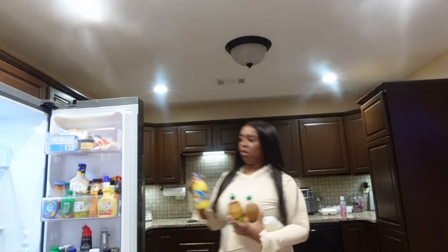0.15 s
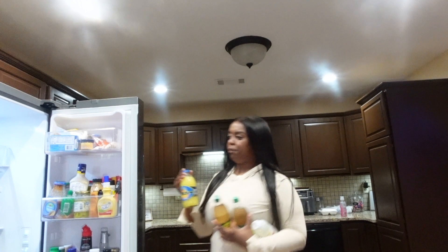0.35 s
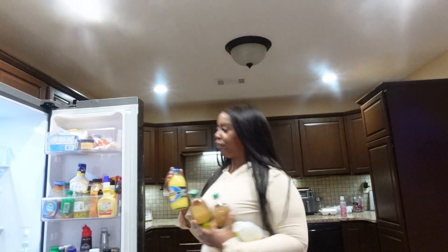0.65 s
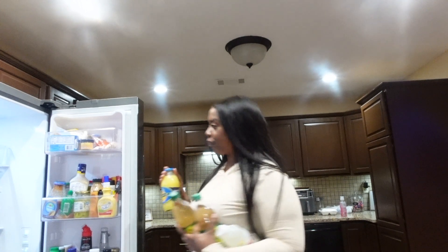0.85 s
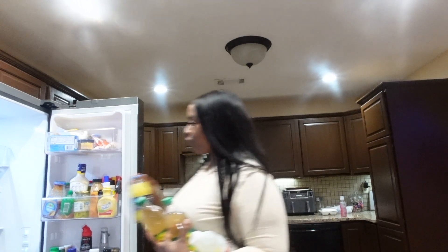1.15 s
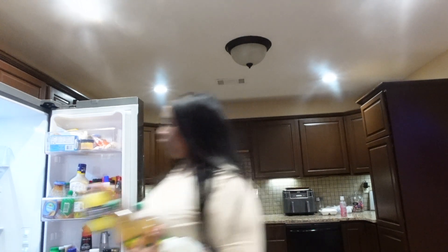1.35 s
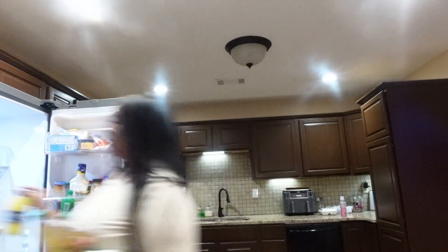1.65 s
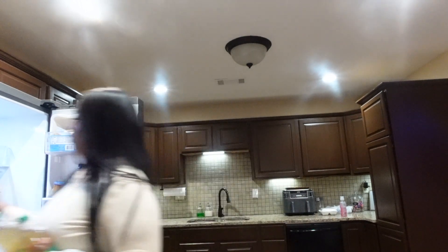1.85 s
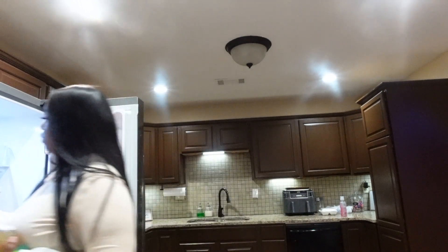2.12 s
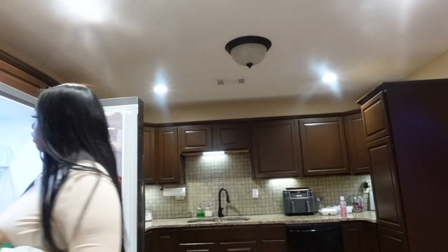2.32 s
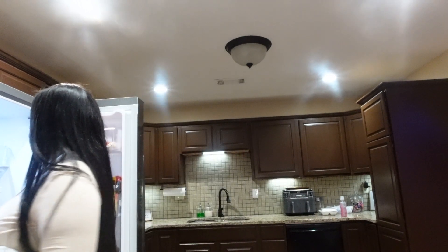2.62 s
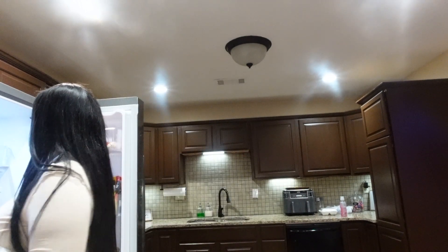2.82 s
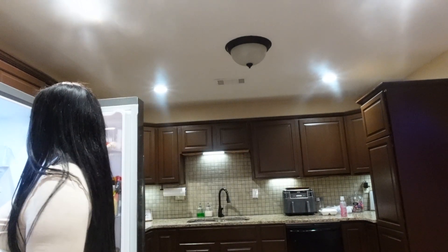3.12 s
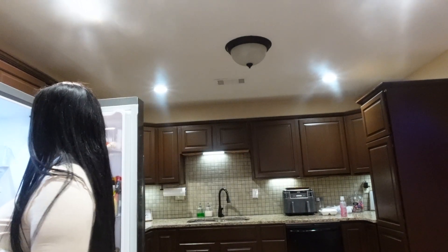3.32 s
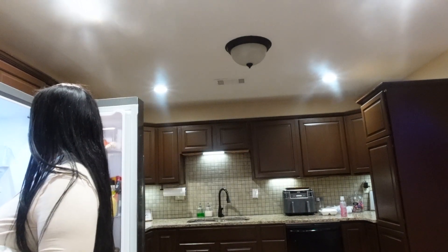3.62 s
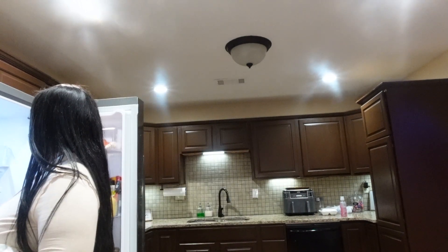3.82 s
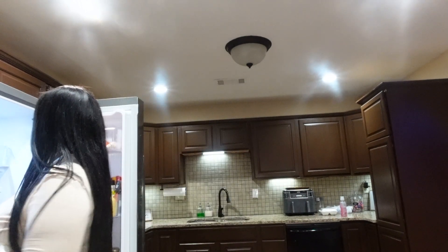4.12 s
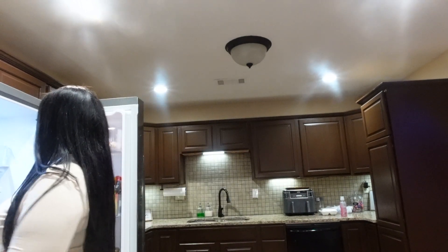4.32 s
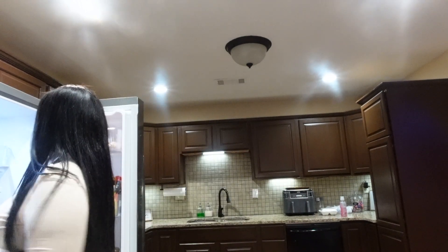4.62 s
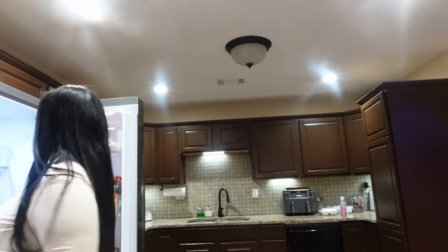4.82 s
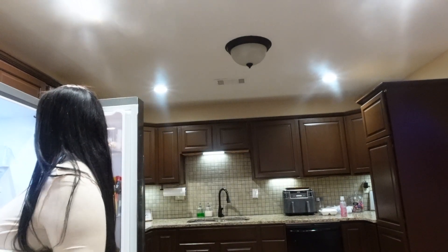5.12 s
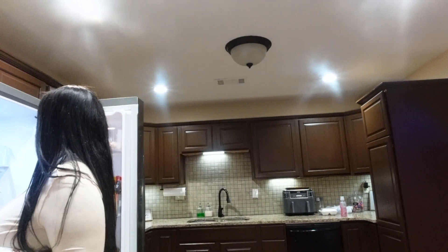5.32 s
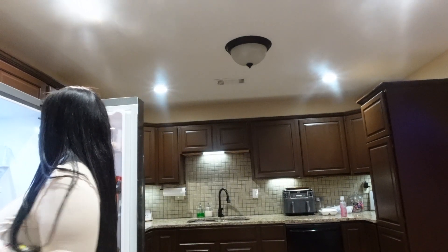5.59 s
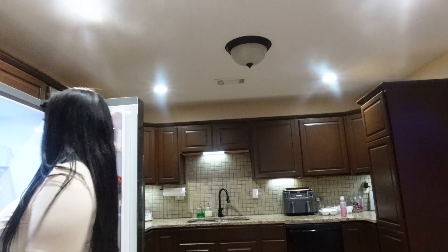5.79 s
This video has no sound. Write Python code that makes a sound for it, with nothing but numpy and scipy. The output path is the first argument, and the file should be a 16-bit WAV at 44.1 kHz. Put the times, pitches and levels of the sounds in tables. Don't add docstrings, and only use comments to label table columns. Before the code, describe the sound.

Close stereo pickup of a lively kitchen: a sharp sole slap, dragging scuffs, a lighter step and a stuttering squeak, then a loud double thud as a full bottle hits a refrigerator shelf. After pauses, two more bottles thud down, each quieter than the last, rocking and making the shelf ring. Small label crinkles and sleeve brushing come between. Every contact leaves a room tail over quiet hum and airy hiss.

```python
import sys
import numpy as np
from scipy import signal
from scipy.fft import rfft, irfft
from scipy.io import wavfile
from scipy.ndimage import uniform_filter1d

SR = 44100
rng = np.random.default_rng(int(sys.argv[2]) if len(sys.argv) > 2 else 0)


def unload_audio(sound):
    columns = np.transpose(np.atleast_2d(sound))
    steps = np.round(np.clip(columns, -1, 1) * 32767)
    wavfile.write(sys.argv[1], SR, steps.astype(np.int16))


def elevation(decibels):
    levels = np.asarray(decibels, float)
    return 10 ** (levels / 20)


N = 262395
LEAD = 8820
BANDS = 30 * 2 ** np.arange(0, 9.4, 1 / 3)


def rms_one(x):
    return x / np.sqrt(np.mean(x ** 2) + 1e-20)


def at_hz(points, hz):
    table = np.array(points)
    return np.interp(np.log(hz), np.log(table[:, 0]), table[:, 1])


def drift(rate, count):
    r = np.exp(-2 * np.pi * rate / SR)
    white = rng.standard_normal(count + SR)
    return rms_one(signal.lfilter([1], [1, -2 * r, r * r], white)[SR:])


def causal_colour(spectrum, tilt_db):
    hz = np.maximum(np.arange(2049) * SR / 4096, 20)
    level_db = at_hz(spectrum, hz) + tilt_db * np.log2(hz / 1000)
    cepstrum = irfft(np.log(elevation(level_db)))
    cepstrum[1:2048] *= 2
    cepstrum[2049:] = 0
    pulse = irfft(np.exp(rfft(cepstrum)))
    return pulse / np.sqrt(np.sum(pulse ** 2))


def band_noise(white, side_table, gain_at):
    out = 0
    for k, (low, high) in enumerate(zip(BANDS, BANDS[1:])):
        band = signal.butter(2, [low, high], "band", fs=SR, output="sos")
        mid, side = signal.sosfilt(band, white[k % 2])
        hz = np.sqrt(low * high)
        side = elevation(at_hz(side_table, hz)) * side
        out = out + gain_at(hz) * (mid + side * [[1], [-1]])
    return out


def refrigerator():
    # (frequency [Hz], level [dB rms])
    hum_tones = [(59.9, -87), (119.8, -59.5), (239.6, -73.5), (359.5, -74), (479.2, -86.5)]
    # (frequency [Hz], level [dB])
    air_colour = [(15, -70), (25, -41), (53, -16.5), (87, -23), (103, -15), (124, -16.5), (146, -10.5),
                  (232, -5), (330, -15.5), (831, -19.5), (927, -20.5), (3150, -25.5), (12900, -28.5),
                  (15200, -28), (16500, -45.5)]
    # (frequency [Hz], side minus mid [dB])
    air_side = [(60, -12.5), (110, -3), (200, -12), (380, -6), (700, -7.5), (1290, -6), (2380, -6),
                (4400, -8.5), (8120, -8.5), (15000, -10.5)]
    # (middle [s], half length [s], lift [dB])
    reaches = [
        (.1, .5, 8.5),
        (1.3, 0.52, 3.5),
        (2.792, .25, 3),
        (3.86, 0.17, 3),
        (4.693, 0.22, 2),
        (5.7, 0.94, 2.5),
    ]
    t = np.arange(N) / SR
    hum = 0
    for hz, db in hum_tones:
        hum = hum + elevation(db + 1 + 0.45 * drift(1.4, count=N)) * np.sin(2 * np.pi * hz * t)
    swell_db = -4.0
    for middle_s, half_s, lift_db in reaches:
        swell_db = swell_db + lift_db * np.exp(-((t - middle_s) / half_s) ** 2)

    def air_gain(hz):
        return elevation(at_hz(air_colour, hz) + swell_db * np.clip(hz / 4000, 0, 1))

    air = band_noise(rng.standard_normal((2, 2, N)), air_side, air_gain)
    return hum * elevation([[.8], [-.8]]) + elevation(-57) * rms_one(air) * elevation([[.4], [-.4]])


def kitchen(x, early_db, build_ms, lumpy_db):
    # (frequency [Hz], T60 [s])
    room_t60 = [(60, 0.83), (250, 0.55), (1000, 0.65), (3000, 0.61), (8000, 0.52), (15000, 0.36)]
    # (frequency [Hz], side minus mid [dB])
    room_side = [(60, -20), (110, -32.5), (200, -24), (380, -16.5), (700, -13), (1290, -14), (2380, -12.5),
                 (4400, -11), (8120, -12.5), (15000, -9.5)]
    far_rooms_db, far_rooms_slower = -30.5, 2.7
    t = np.arange(SR) / SR
    lumps = np.minimum(rng.exponential(1, (2, 1, SR)), 6)
    sizes = elevation(lumpy_db * np.exp(-t / 1.1) * lumps)
    echoes = rng.standard_normal((2, 2, SR)) * sizes
    echoes /= np.sqrt(uniform_filter1d(echoes ** 2, size=2001))

    def decay(hz):
        fall_db = -60 * t / at_hz(room_t60, hz)
        return elevation(fall_db) + elevation(far_rooms_db + fall_db / far_rooms_slower) * (1 - t)

    response = band_noise(echoes, room_side, decay)
    response *= 1 - np.exp(-t * 1000 / build_ms)
    response *= elevation(early_db * np.exp(-t / 0.026))
    response /= np.sqrt(np.sum(response ** 2) / 2)
    return signal.fftconvolve(x[None], response, axes=1)[:, LEAD:LEAD + N]


def contacts(rows, colour, modes, gain_db, room_db, ring_db=0):
    out = np.zeros((2, N + LEAD + SR))
    t = np.arange(SR // 3) / SR
    ms = t[:2000] * 1000
    for s, db, chatter_ms, hard_db in rows:
        at = LEAD + round(s * SR)
        hit_db = db + gain_db
        draw = rng.random((3, 2000))
        chatter = (draw[0] < .2) * (draw[1] - .5) * np.exp(-ms / max(chatter_ms, .1))
        chatter *= 1 - np.exp(-ms / max(0.22 * chatter_ms, .05))
        chatter[0] = .5 * np.exp(-chatter_ms / 4.24)
        chatter /= np.sqrt(np.sum(chatter ** 2))
        click = causal_colour(colour, hard_db)
        out[0, at:at + 6095] += elevation(hit_db) * np.convolve(chatter, click)
        out[1, at:at + 4096] += elevation(hit_db + room_db + 4.5) * click
        for (hz, mode_db, t60), chance in zip(modes, draw[2]):
            ring = elevation(mode_db + 3.5 * chance - 60 * t / min(t60, .22)) * np.sin(2 * np.pi * hz * t)
            ring *= 1 - np.exp(-t / 0.027)
            level = elevation(hit_db + ring_db - 1.2 * hard_db - 33.5)
            out[:, at:at + len(t)] += level * ring * elevation([[0], [1.5]])
    return out[:, :N + LEAD]


def rings(rows, room_db):
    width_hz_at_1ms, widest_share = 910, 0.79
    out = np.zeros((2, N + LEAD + SR))
    for s, db, hz, push_ms in rows:
        width_hz = min(width_hz_at_1ms / np.sqrt(push_ms), widest_share * hz)
        age = np.arange(9000) * 1000 / SR / push_ms
        push = rng.standard_normal(9000) * np.exp(-age) * (1 - np.exp(-4 * age))
        r = np.exp(-np.pi * width_hz / SR)
        poles = [1, -2 * r * np.cos(2 * np.pi * hz / SR), r * r]
        once = signal.lfilter([1, 0, -1], poles, push + 1e-18)
        ring = signal.lfilter([1, 0, -1], poles, once)
        at = LEAD + round(s * SR)
        out[:, at:at + 9000] += elevation(db) * ring / np.max(np.abs(ring)) * elevation([[0], [room_db + 6.5]])
    return out[:, :N + LEAD]


def scuffs():
    # (touch-down [s], slide [s], rub [dB], brightness [dB])
    slides = [
        (-.19, 0.19, -36.5, -2),
        (.3, 0.083, -32.5, 2.5),
        (0.727, 0.19, -33.5, -2.5),
        (1.47, .1, -54, -2),
        (1.568, 0.026, -41.5, 5.5),
        (1.728, 0.17, -40.5, -9),
        (1.879, .17, -30, -6.5),
    ]
    # (frequency [Hz], level [dB])
    scuff_colour = [(180, -43), (300, -24), (486, -23.5), (749, -11), (994, -6.5), (1360, -7.5),
                    (1560, -3.5), (2790, -3), (6960, -8), (13800, -19.5), (16000, -27.5)]
    press_s, press_from_db = 0.031, -11
    sag_db_per_s, lift_db_per_s = 20, 201.5
    dull_db_per_s = 31
    t = (np.arange(N + LEAD) - LEAD) / SR
    grit = (rng.random(len(t)) < 9000 / SR) * elevation(1.6 * np.minimum(rng.exponential(1, len(t)), 5))
    grit = grit * rng.choice([-1, 1], len(t))
    rub = rms_one(signal.fftconvolve(grit, causal_colour(scuff_colour, 0))[:len(t)])
    bright = signal.sosfilt(signal.butter(2, 4000, "high", fs=SR, output="sos"), rub)
    out = np.zeros(len(t))
    for s, slide_s, rub_db, bright_db in slides:
        age = np.maximum(t - s, 0)
        db = rub_db + press_from_db * np.maximum(1 - age / press_s, 0)
        db = db - sag_db_per_s * age - lift_db_per_s * np.maximum(age - slide_s, 0)
        touching = uniform_filter1d(1. * (t > s), size=500)
        extra_treble = (elevation(bright_db - dull_db_per_s * age) - 1) * bright
        out += touching * elevation(db) * (rub + extra_treble)
    return out * elevation(0.63 * drift(25, count=len(t)))


def slippers():
    # (time [s], level [dB], chatter [ms], hardness [dB/octave])
    slaps = [
        (.2932, -26, 1, 0),
        (.2962, -11.5, 0.84, 1.5),
        (.7747, -19.5, 1.2, 8.5),
        (1.4962, -38, 3.7, -6),
    ]
    # (time [s], level [dB], chatter [ms], hardness [dB/octave])
    ticks = [
        (.3017, -17.5, 0.26, 2.5),
        (.3268, -9, 1, -2),
        (1.5405, -38.5, .6, 1.5),
        (1.5465, -42, .6, 1),
        (1.5955, -31, 0.65, 1),
        (1.602, -33.5, .5, 3.5),
        (1.6098, -33, .8, 1),
    ]
    # (frequency [Hz], level [dB])
    slap_colour = [(88, -65.5), (150, -19), (213, -18.5), (675, -7.5), (854, -16.5), (1100, -6.5),
                   (1790, -10), (2310, 4), (2920, -7.5), (4080, -1.5), (8730, -19.5), (16000, -43.5)]
    # (time [s], level [dB], pitch [Hz], push [ms])
    sole_rings = [
        (.2958, -10.5, 3120, 0.38),
        (.3015, -25.5, 4000, .3),
        (.326, -21, 2000, 0.85),
        (.776, -24, 1530, 1.65),
    ]
    # (time [s], level [dB], pitch [Hz], push [ms])
    squeaks = [
        (1.755, -33, 1270, 11),
        (1.779, -34.5, 1260, 6),
        (1.788, -30, 1250, 12),
        (1.829, -28.5, 1205, 12),
        (1.762, -43, 2700, 15),
        (1.85, -35.5, 2300, 15),
    ]
    return (contacts(slaps, slap_colour, [], gain_db=6.5, room_db=6.5)
            + rings(sole_rings, room_db=-5.5)
            + contacts(ticks, slap_colour, [], gain_db=8.0, room_db=-5.5)
            + rings(squeaks, room_db=-7)
            + scuffs() * elevation([[-8.0], [0]]))


def bottles():
    # (time [s], level [dB], chatter [ms], hardness [dB/octave])
    first = [
        (2.1676, -9.5, 6.0, -1),
        (2.1712, 0.5, 4, 1.6),
        (2.181, -5, 3.5, -1.5),
        (2.203, -6, 5.3, -1.5),
        (2.261, -11.5, 3, -3.5),
    ]
    # (time [s], level [dB], chatter [ms], hardness [dB/octave])
    first_drop = [
        (2.3125, -13.5, 3.0, -1.5),
        (2.316, -0.5, 9.9, -0.5),
        (2.3225, -6.5, 1.8, 1),
        (2.338, -10, 2.5, -3.5),
    ]
    # (time [s], level [dB], chatter [ms], hardness [dB/octave])
    second = [
        (3.409, -35, 10, 9),
        (3.43, -21, 4.8, -2),
        (3.4365, -6.5, 13, 2.5),
        (3.447, -10, 10, -1.5),
        (3.487, -16.5, 7.1, -2.5),
        (3.66, -23, 9.4, -1.5),
        (3.715, -28, 10, -3),
    ]
    # (time [s], level [dB], chatter [ms], hardness [dB/octave])
    third = [
        (4.954, -31, 14, -2),
        (4.98, -24, 10, -2),
        (4.991, -19, 4.8, 4.5),
        (4.9965, -11.5, 10.4, 0.5),
        (5.006, -23, 6.3, -1),
        (5.033, -19, 6.1, -0.5),
        (5.089, -22, 4.3, -2),
        (5.249, -40, 8.0, 1),
    ]
    # (frequency [Hz], level [dB])
    first_colour = [(41, -56), (70, -25.5), (233, -13.5), (321, -11), (368, -14.5), (403, -0.5), (441, -15),
                    (620, -8.5), (1050, -5.5), (1580, -4), (5620, -15), (10200, -30), (16000, -42.5)]
    second_colour = [(41, -44), (70, -20), (108, 0), (148, -5), (286, 1.5), (494, -8.5), (541, -3.5),
                     (1100, -7.5), (1730, -7), (4910, -17.5), (10400, -33.5), (16000, -46)]
    third_colour = [(41, -51), (70, -27), (113, -7), (218, -5), (244, -8.5), (314, -1.5), (451, -11),
                    (1150, -10), (1310, -11.5), (3820, -19), (13000, -47.5), (16000, -59)]
    # (frequency [Hz], level [dB], T60 before the 0.22 s cap [s])
    first_shelf = [(141, -38.5, 5.0), (269.3, -6, 0.45), (329, 1, 0.25), (397, -1, 0.34),
                   (550.5, -20, 0.42), (599, -39.5, 0.36)]
    second_shelf = [(115.6, -3, 0.27), (186.3, -20, 0.3), (277, -2, 0.7)]
    third_shelf = [(110.4, -2, 0.49), (224, 3.5, 1.6), (298, -11, 0.56), (415, -2, 0.53), (556, -4.5, 0.32)]
    # (time [s], level [dB], chatter [ms], hardness [dB/octave])
    crinkles = [
        (.579, -39, 12.0, 8),
        (3.655, -46, 15.0, 4.0),
        (3.83, -49.5, 15.0, 9),
        (4.08, -47.5, 12.0, -2.5),
        (4.3705, -42, 3.0, 1),
        (4.954, -42.5, 13, 3),
    ]
    # (frequency [Hz], level [dB])
    crinkle_colour = [(800, -20), (2500, 4), (6000, 12), (11000, 0), (16000, -8.5)]
    # (time [s], level [dB], pitch [Hz], push [ms])
    bottle_rings = [(2.181, -12, 1260, 5.7), (2.203, -22, 1230, 4), (2.21, -14, 1950, 5.8),
                    (2.262, -19.5, 386, 7.4), (2.3125, -17.5, 2970, 1.7), (2.316, -12, 1659, 5.8),
                    (2.338, -14, 312, 8.3), (3.452, -18.5, 1770, 4.8), (3.70, -58, 95, 29.4),
                    (3.96, -55.5, 1327, 30), (4.371, -46.5, 2710, 2.8), (4.955, -47.5, 1040, 6.5),
                    (4.962, -42, 470, 17), (4.965, -42.5, 75.4, 13), (4.997, -23, 2540, 5.5),
                    (5.245, -42, 298, 7.6)]
    return (contacts(first, first_colour, first_shelf, gain_db=14.0, room_db=-3, ring_db=-2.5)
            + contacts(first_drop, first_colour, first_shelf, gain_db=13.0, room_db=-7, ring_db=-13)
            + contacts(second, second_colour, second_shelf, gain_db=12, room_db=-1.0, ring_db=-15)
            + contacts(third, third_colour, third_shelf, gain_db=13.0, room_db=-2.5, ring_db=-3)
            + contacts(crinkles, crinkle_colour, [], gain_db=13.0, room_db=-2)
            + rings(bottle_rings, room_db=-11))


def scene():
    feet_direct, feet_room = slippers()
    shelf_direct, shelf_room = bottles()
    at_floor = feet_direct[LEAD:] + kitchen(feet_room, early_db=0.5, build_ms=1.84, lumpy_db=1.5)
    at_shelf = shelf_direct[LEAD:] + kitchen(shelf_room, early_db=1.0, build_ms=2.8, lumpy_db=2.5)
    return at_floor * elevation([[.3], [-.3]]) + at_shelf * elevation([[.6], [-.6]]) + refrigerator()


def roll_off(x):
    return signal.sosfilt(signal.butter(12, 16660, fs=SR, output="sos"), x)


def record(dry):
    thin = signal.sosfilt(signal.butter(3, 55, "high", fs=SR, output="sos"), dry)
    thin = signal.sosfilt(signal.cheby2(10, 50, 16500, fs=SR, output="sos"), thin)
    rounded = 0.74 * np.tanh(thin / 0.77)
    return roll_off(rounded)


dry = scene()
out = record(dry)
unload_audio(out)
```